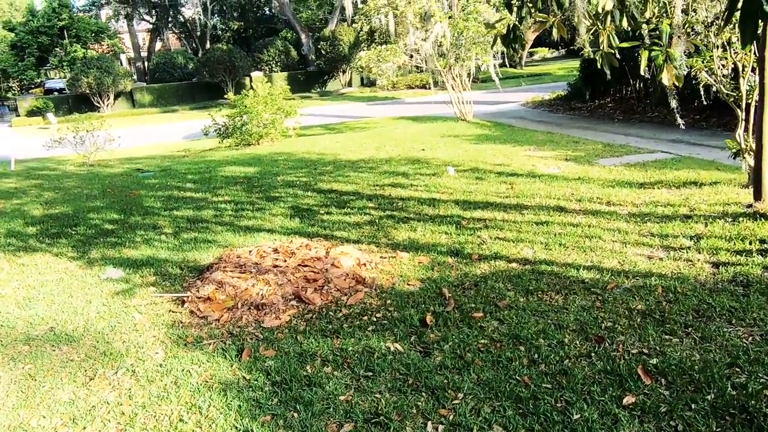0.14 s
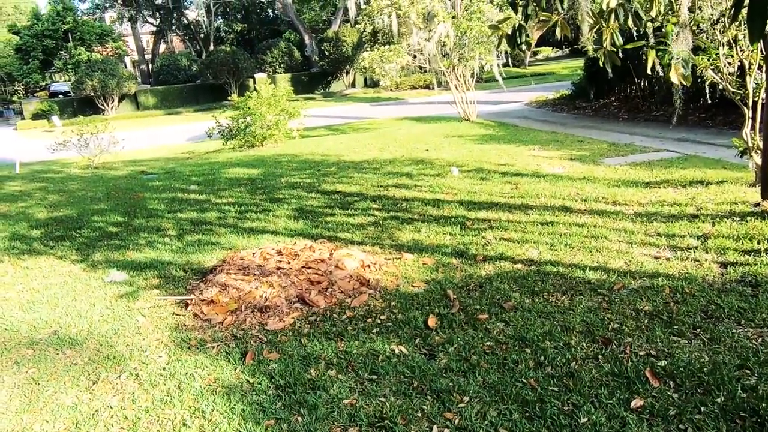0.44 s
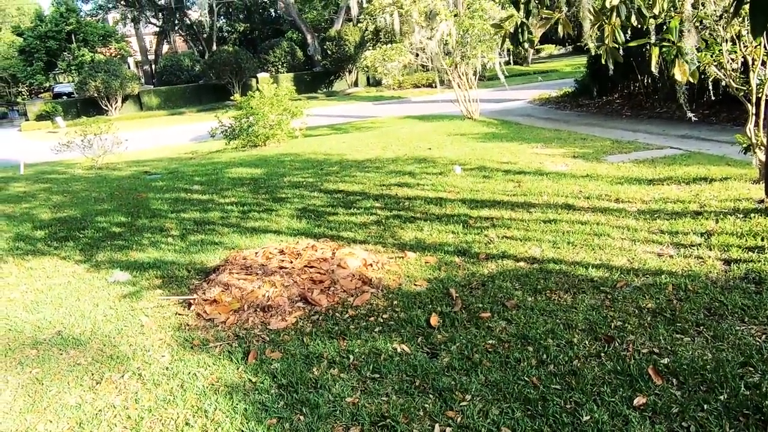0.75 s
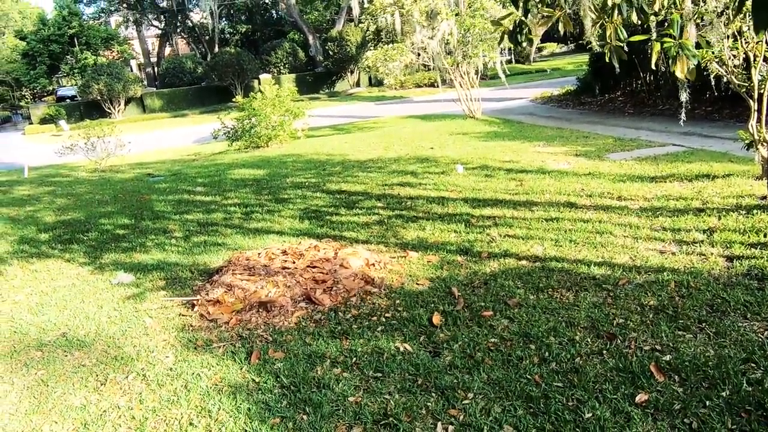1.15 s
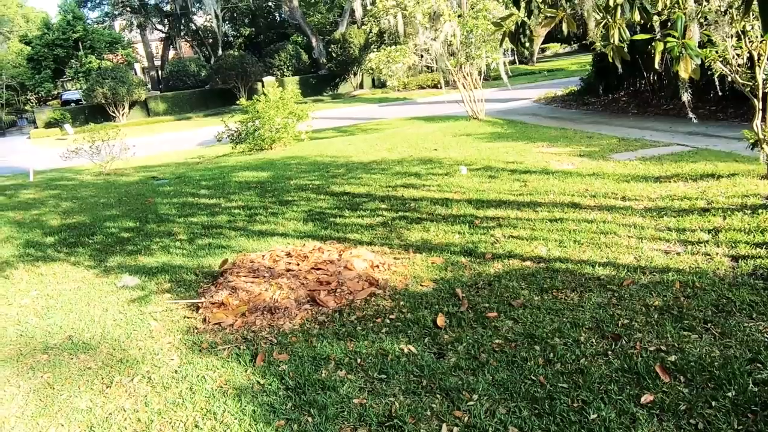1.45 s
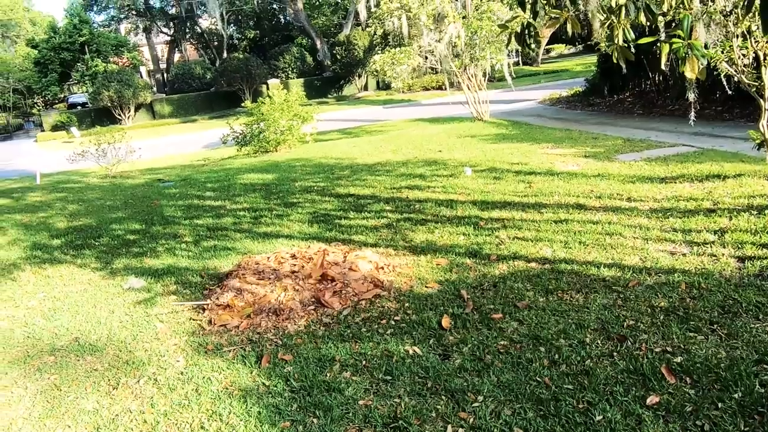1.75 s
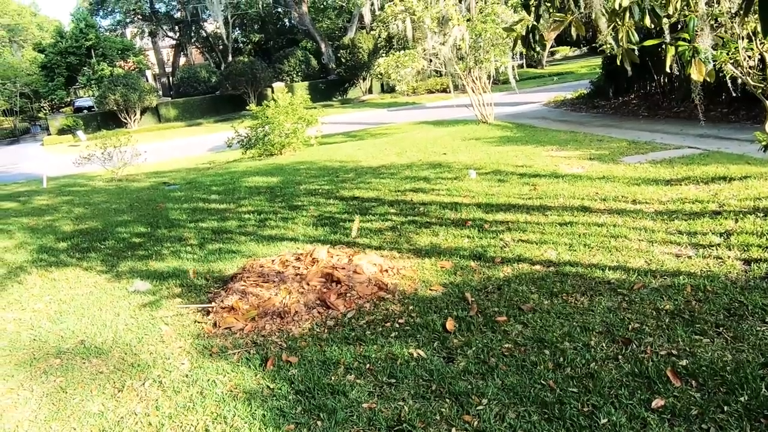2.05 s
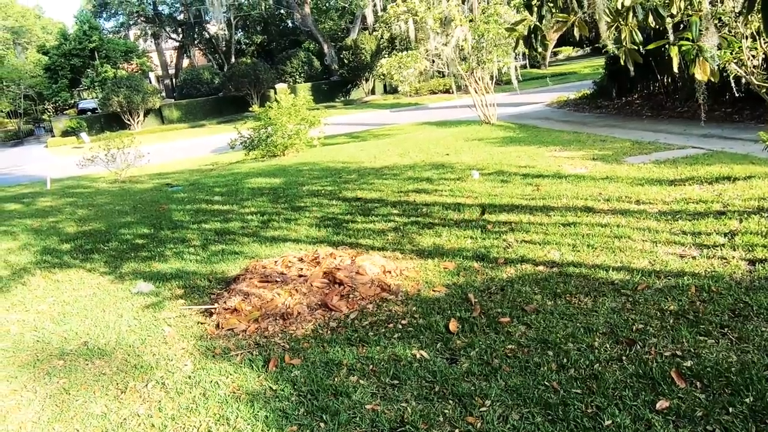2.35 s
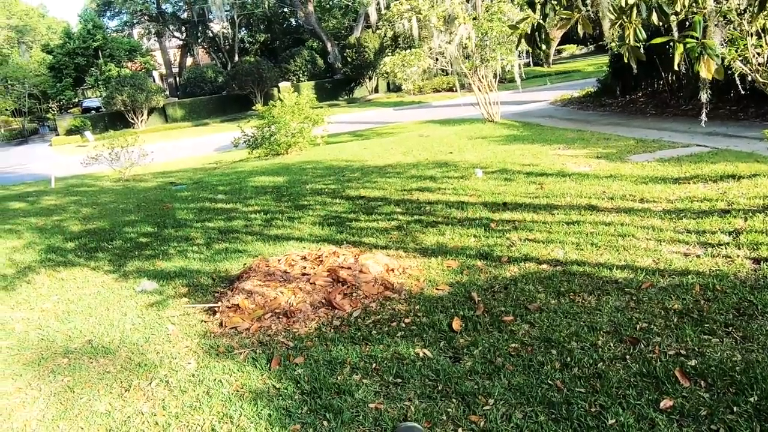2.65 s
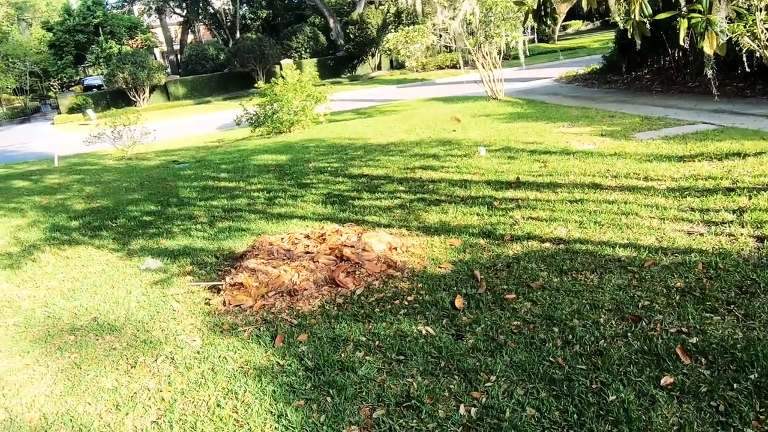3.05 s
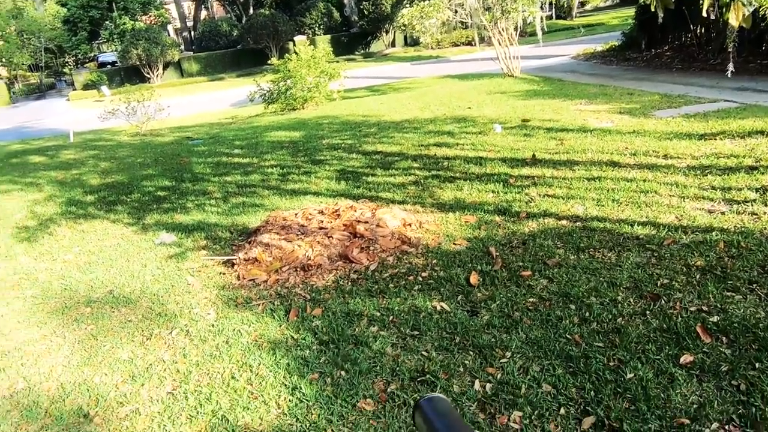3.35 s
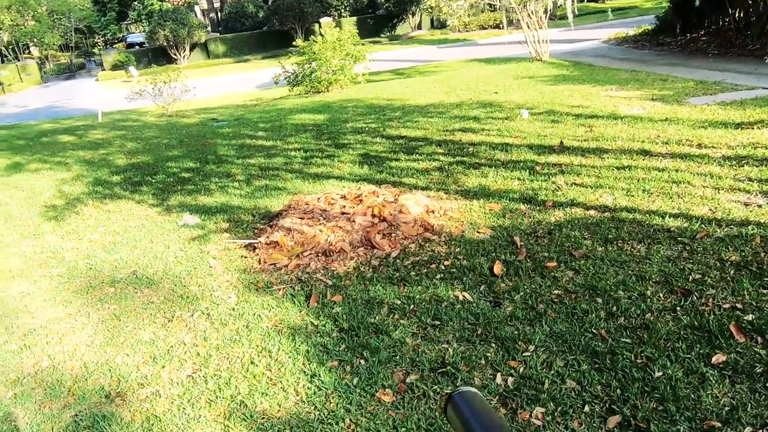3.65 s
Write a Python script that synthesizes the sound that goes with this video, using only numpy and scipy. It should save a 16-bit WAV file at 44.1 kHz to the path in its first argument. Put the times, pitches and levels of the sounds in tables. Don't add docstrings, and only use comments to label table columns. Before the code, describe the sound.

A battery backpack leaf blower, heard close from the wearer's chest on a lawn, coasts low, then whines rapidly upward within a second and holds a steady humming roar of air over faint wind and distant traffic.

```python
import sys
import numpy as np
from scipy import signal
from scipy.fft import rfft, irfft
from scipy.io import wavfile
from scipy.ndimage import uniform_filter1d

SR = 44100
rng = np.random.default_rng(int(sys.argv[2]) if len(sys.argv) > 2 else 0)


def to_wav(s):
    ch = np.atleast_2d(s).T
    pcm = np.round(np.clip(ch, -1, 1) * 32767)
    wavfile.write(sys.argv[1], SR, pcm.astype(np.int16))


def voltage_ratio(level):
    return 10 ** (np.asarray(level, float) / 20)


N = 167580
CARRIER_HZ = 7854


def level(x, db):
    return x * voltage_ratio(db) / np.sqrt(np.mean(x ** 2))


def read(table, hz):
    table = np.array(table, float)
    return np.interp(np.log(hz), np.log(table[:, 0]), table[:, 1])


def band(x, hz, width):
    return signal.lfilter(*signal.iirpeak(hz, hz / width, SR), x)


def noise_band(hz, width, db):
    return level(band(rng.standard_normal(N), hz, width), db)


def walk(rate):
    hold = int(SR / rate)
    steps = np.repeat(rng.standard_normal(N // hold + 1), hold)
    return 1.44 * uniform_filter1d(uniform_filter1d(steps, hold), hold)[:N]


def window(t, on, off, fade):
    rise = 1 / (1 + np.exp((on - t) / fade * 3))
    return rise / (1 + np.exp((t - off) / fade * 3))


def bands(table, centres, db_of):
    top_fall_db_per_oct = -31
    f = np.maximum(np.arange(N // 2 + 1) * SR / N, 1)
    octaves_above = np.maximum(np.log2(f / table[-1][0]), 0)
    colour = voltage_ratio(read(table, f) + top_fall_db_per_oct * octaves_above)
    spectrum = rfft(rng.standard_normal(N)) * colour * np.minimum(f / 40, 1) ** 2
    scale = 1 / np.std(irfft(spectrum, N))
    out = 0
    for k, hz in enumerate(centres):
        share = np.interp(np.log(f), np.log(centres), np.arange(len(centres)) == k)
        out = out + irfft(spectrum * share, N) * voltage_ratio(db_of(hz))
    return out * scale


# time in seconds, shaft speed in Hz.
SHAFT_SPEED = [(0, 141), (.14, 130), (.215, 137), (.29, 160), (.37, 193), (.44, 233), (.52, 279),
               (.62, 343), (.68, 378), (.71, 406), (.75, 428), (.8, 436.5), (.87, 438.7), (1.3, 437.9),
               (2.1, 437.3), (2.9, 436.9), (3.8, 436.3)]
# time in seconds, air flow in dB re full.
AIR_FLOW = [(0, -19.5), (.14, -18.5), (.215, -15), (.29, -12.5), (0.371, -8.5), (.44, -5.5), (.52, -2),
            (.62, 0), (.7, 0.5), (.8, 1), (1.3, 0.2), (2.9, 0.3), (3.8, 0.6)]


def run_up(t):
    hz, flow = (uniform_filter1d(np.interp(t, *np.array(c).T), size=900) for c in (SHAFT_SPEED, AIR_FLOW))
    return hz, flow


# shaft speed in Hz, hum level in dB.
FRAME_RESPONSE = [(140, -61), (190, -39), (235, -29), (280, -27), (335, -33), (375, -18), (405, -14.5),
                  (437, -18.5)]


def frame_hum(t, hz, turn):
    sag_db_per_s, wobble_db = -0.35, .5
    db = read(FRAME_RESPONSE, hz) + sag_db_per_s * (t - 0.5) + wobble_db * walk(5.2)
    return voltage_ratio(db) * np.sin(turn)


# multiple of shaft speed, level in dB, patchiness in dB.
SHAFT_ORDERS = [(2, -50, 3), (3, -35.5, 2.4), (4, -44, 3), (6, -52, 3), (12, -49.5, 2.6), (24, -64.5, 2.8)]
# centre in Hz, width in Hz, gain in dB.
HOUSING_PANELS = [(595, 40, 20), (820, 40, 10), (1700, 250, 14), (3000, 260, 22), (4350, 150, 12),
                  (5050, 100, 8)]


def shaft_orders(hz, turn):
    build_db_per_oct = 18
    out = 0
    for k, db, patchy_db in SHAFT_ORDERS:
        panels = sum(g / (1 + ((k * hz - f) / w) ** 2) for f, w, g in HOUSING_PANELS)
        colour = build_db_per_oct * np.log2(hz / hz[-1]) + panels - panels[-1]
        patches = patchy_db * (walk(45) + .35 * walk(5))
        jitter = .025 * (k + 10) * walk(40)
        out = out + voltage_ratio(db + colour + patches) * np.sin(k * turn + jitter)
    return out


def coil_whine(t, hz, turn):
    poles = 15
    carrier = 2 * np.pi * CARRIER_HZ * t
    coil_db = -53.5 + 14 * np.log2(hz / 137) + 2.5 * walk(90)
    coil = voltage_ratio(coil_db) * np.sin(poles * turn + .5 * walk(60))
    twice = voltage_ratio(-66 + 3 * walk(50)) * np.sin(2 * poles * turn)
    mirror = voltage_ratio(-48.5 + 2.5 * walk(70)) * np.sin(carrier - 2 * poles * turn + .5 * walk(60))
    out = coil * window(t, .21, .45, .03)
    out += mirror * window(t, .245, .33, .04)
    return out + twice * window(t, .21, .3, .02)


# centre in seconds, length in seconds, level in dB.
WHISTLE_BURSTS = [
    (.12, .04, -82),
    (.265, .06, -67),
    (.45, .06, -65),
    (.6, .03, -67),
]


def controller_whistle(t, turn, flow):
    carrier = 2 * np.pi * CARRIER_HZ * t
    bursts = sum(voltage_ratio(db) * np.exp(-((t - s) / w) ** 2) for s, w, db in WHISTLE_BURSTS)
    whistle = np.sin(carrier) * voltage_ratio(2 * walk(41)) * bursts
    sideband = voltage_ratio(-80.5 + flow + 2 * walk(8)) * np.sin(2 * carrier - 5 * turn)
    return whistle + sideband


def coasting(t, turn):
    whine = voltage_ratio(-54) * np.sin(20.4 * turn) * np.exp(-t / .03)
    return whine + noise_band(3100, 25, -59) * window(t, .05, .2, .04)


def tones(t, hz, flow):
    turn = 2 * np.pi * np.cumsum(hz) / SR
    out = frame_hum(t, hz, turn) + shaft_orders(hz, turn) + coil_whine(t, hz, turn)
    out += controller_whistle(t, turn, flow) + coasting(t, turn)
    return np.sqrt(2) * out


# frequency in Hz, density in dB per Hz.
AIR_SPECTRUM = [(90, -8.5), (160, -1.5), (650, 0.5), (2000, -4.5), (3300, -11), (5000, -17.5),
                (7000, -29.5), (10500, -29.5)]
# frequency in Hz, side re mid in dB.
AIR_WIDTH = [(60, -6), (110, -34.5), (200, -7.5), (380, -12), (700, -26), (1290, -80.5), (2380, -28),
             (4400, -15.5), (8120, -10), (15000, -4)]
DUCT_CENTRES = [338, 476, 683, 807, 1020, 1673, 2930, 3180, 3605, 4225, 4565, 5690, 6050, 8340]
# width in Hz, level in dB.
DUCT_RESONANCES = [(34.8, -44.5), (24.5, -38), (44.2, -37.5), (52, -46), (130, -40), (30, -47),
                   (92.593, -39.5), (130, -42), (82, -47.5), (83.7, -53), (150, -56), (40, -73), (130, -88),
                   (260, -66.5)]


def air(flow):
    air_db = -29
    gust = walk(5.89)
    centres = 90 * 2 ** np.arange(0, 7.6, .5)

    def law(hz):
        growth = 1 + 0.1 * np.log2(hz / 2000) + 0.66 * max(np.log2(hz / 3200), 0)
        return flow * np.maximum(growth, .3) + 0.58 * gust

    roar = voltage_ratio(air_db) * bands(AIR_SPECTRUM, centres, lambda hz: law(hz) + 0.82 * walk(20))
    for hz, (width, db) in zip(DUCT_CENTRES, DUCT_RESONANCES):
        roar += noise_band(hz, width, db) * voltage_ratio(law(hz) + 0.95 * walk(8))
    side = [(f, db + read(AIR_SPECTRUM, f)) for f, db in AIR_WIDTH if f < 9000]
    side += [(11000, -36), (12500, -32)]
    return roar, voltage_ratio(air_db - 23) * bands(side, centres, law)


# centre in Hz, width in Hz, depth from 0 to 1.
HOUSING_DIPS = [(7520, 500, .55), (11200, 300, .6), (1220, 120, .4), (400, 60, .5)]


def housing_dips(roar):
    for f, width, depth in HOUSING_DIPS:
        roar = roar - depth * band(roar, f, width)
    return roar


def tick(t):
    start_s, t60_s = .3501, .005
    age = np.maximum(t - start_s, 0)
    hit = (t >= start_s) * rng.standard_normal(N) * np.exp(-np.log(1000) * age / t60_s)
    return voltage_ratio(-36) * (1.5 * band(hit, 9500, 2500) + 1.2 * band(hit, 5000, 1500))


# frequency in Hz, density in dB per Hz.
TOWN_SPECTRUM = [(32, -11), (52, 8), (85, -7), (180, 12), (290, -1), (600, -8.5), (2500, -22), (5000, -52)]


def town():
    town_db, side_db = -46, -2
    centres = 30 * 2 ** np.arange(0, 9, 1.)
    mid = bands(TOWN_SPECTRUM, centres, lambda hz: 1.5 * walk(6.5))
    side = bands(TOWN_SPECTRUM, centres, lambda hz: 0.4 * walk(2.7) - 12 * (hz < 80))
    return voltage_ratio(town_db) * mid + noise_band(286, 24, -51.5), voltage_ratio(town_db + side_db) * side


def scene():
    t = np.arange(N) / SR
    hz, flow = run_up(t)
    roar, roar_side = air(flow)
    far, far_side = town()
    hunt = 1 + .0004 * walk(6)
    mid = housing_dips(roar) + tones(t, hz * hunt, flow) + far + tick(t)
    side = roar_side + far_side
    return np.array([mid + side, mid - side])


def roll_off(x):
    return signal.sosfilt(signal.butter(12, 15640, fs=SR, output="sos"), x)


def record(dry):
    heard = signal.sosfilt(signal.butter(6, 14200, fs=SR, output="sos"), dry)
    return roll_off(heard)


dry = scene()
out = record(dry)
to_wav(out)
```